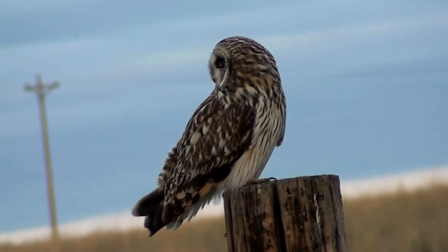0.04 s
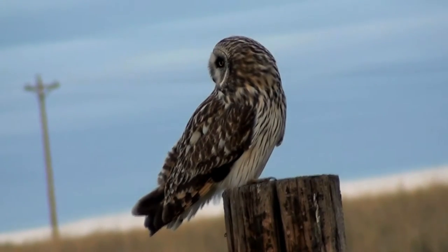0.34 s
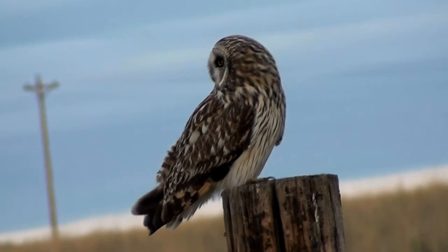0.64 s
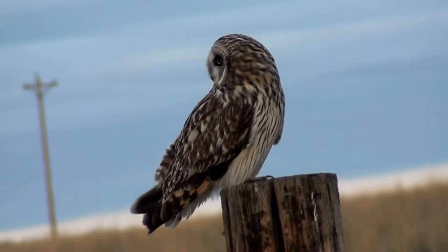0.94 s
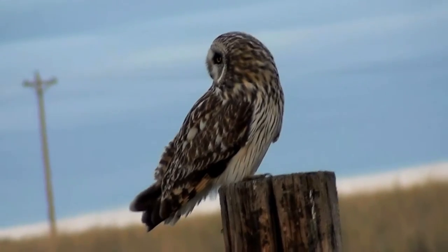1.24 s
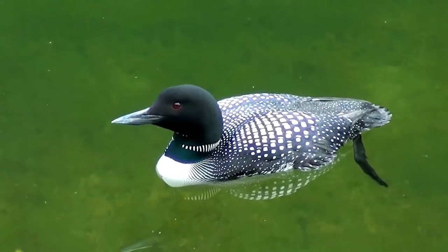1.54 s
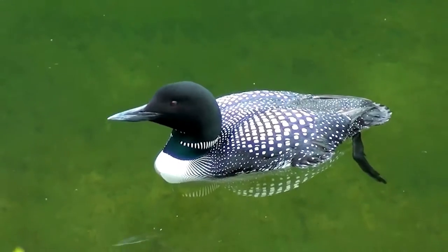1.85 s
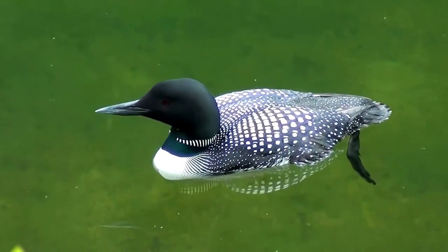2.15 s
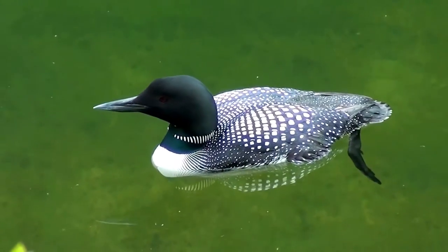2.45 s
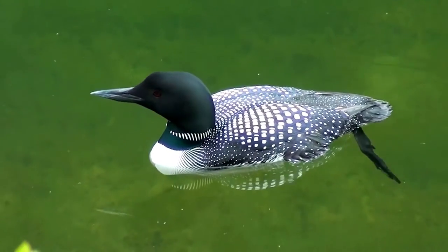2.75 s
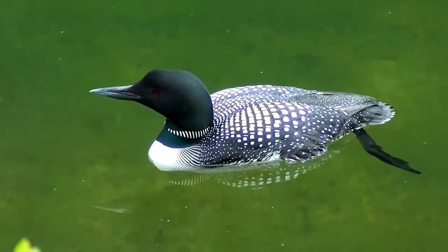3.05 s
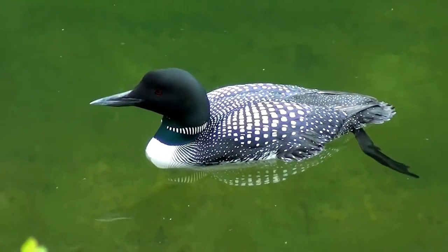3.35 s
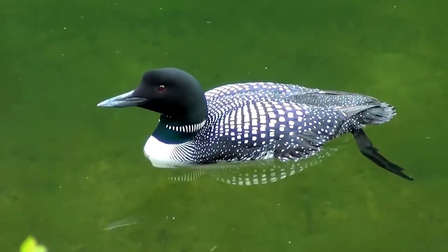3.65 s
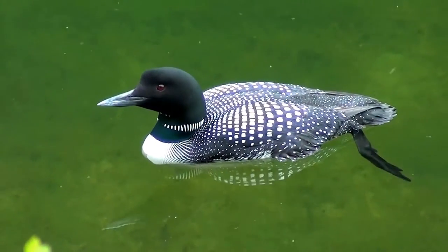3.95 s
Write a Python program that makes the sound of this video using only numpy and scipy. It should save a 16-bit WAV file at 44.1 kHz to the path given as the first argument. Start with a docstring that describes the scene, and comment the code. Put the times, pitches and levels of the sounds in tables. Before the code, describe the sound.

A small bird trills rapidly at a lakeside, after a songbird whistles a short, soft phrase in a quiet field. The high trill echoes slightly over a distant rush, and a dry tick comes near the end.

```python
"""A small bird trills at a lakeside, 16 syllables a second, each a burst of quick gliding tones.
Before it, in a quiet field, a songbird whistles a phrase, at times with both sides of its syrinx;
the field fades out and the lake fades in. The trill echoes off water and shore over a distant rush,
a low hum and hiss; one louder chirp and three dry ticks cut in.
A faint electrical whine lies under both scenes."""
import sys
import numpy as np
from scipy import signal
from scipy.fft import rfft, irfft, next_fast_len
from scipy.io import wavfile
from scipy.ndimage import map_coordinates

SR = 44100
rng = np.random.default_rng(int(sys.argv[2]) if len(sys.argv) > 2 else 0)


def int16_out(signal):
    """Quantize to a 16-bit WAV file."""
    q = np.round(np.clip(np.atleast_2d(signal).T, -1, 1) * 32767)
    wavfile.write(sys.argv[1], SR, q.astype(np.int16))


N = 176400
T = np.arange(N) / SR


def amp(db):
    """Decibels to gain."""
    return 10 ** (np.asarray(db) / 20)


def curve(points, hz):
    """Gain of an EQ curve drawn through (f/Hz, level/dB) points on a log frequency axis."""
    f, db = np.transpose(points)
    return amp(np.interp(np.log(hz + 1), np.log(f + 1), db))


def ramp(u):
    """A smooth step from 0 to 1."""
    return np.sin(np.pi / 2 * np.clip(u, 0, 1)) ** 2


def wobble(rate):
    """A smooth random curve, rate knots a second."""
    return map_coordinates(rng.standard_normal(int(N * rate / SR) + 4), [T * rate])


def filtered(x, response):
    """Filter x with a gain given as a function of frequency."""
    size = next_fast_len(N + SR // 2)
    return irfft(rfft(x, size) * response(np.fft.rfftfreq(size, 1 / SR)), size)[..., :N]


def noise(response, width):
    """Coloured stereo noise with a mid of rms 1; the width curve sets side over mid."""
    mid, side = filtered(rng.standard_normal((2, N)),
                         lambda hz: response(hz) * np.array([np.ones_like(hz), curve(width, hz)]))
    return np.array([mid + side, mid - side]) / mid.std()


def add(track, onset, sound):
    """Mix a sound into a track at an onset in seconds."""
    i = round(onset * SR)
    sound, i = sound[max(-i, 0):], max(i, 0)
    track[i:i + len(sound)] += sound[:max(N - i, 0)]


def syrinx(notes):
    """A bird's voice: pure tones, each gliding on an arc through three pitches."""
    track = np.zeros(N)
    for onset, length, start, middle, end, db, tilt_db, attack, release in notes:
        t = np.arange(int(length * SR)) / SR
        progress = t / length
        hz = np.polyval(np.polyfit([0, .5, 1], [start, middle, end], 2), progress)
        envelope = amp(db + tilt_db * progress) * ramp(t / attack) * ramp((length - t) / release)
        add(track, onset, envelope * np.sin(2 * np.pi * (np.cumsum(hz) / SR + rng.random())))
    return track


def songbird():
    """A whistled phrase; where both sides of the syrinx sound at once, the notes beat."""
    # notes: t/s, length/s, start f/Hz, middle f/Hz, end f/Hz, level/dB, tilt/dB, attack/s, release/s
    whistles = [(-.02, 0.1, 2735, 2735, 2725, -49.5, -1.5, .01, .02),
                (.317, 0.086, 3085, 3042, 3060, -48.5, -12, 0.015, .015),
                (.338, 0.056, 2975, 2972, 2920, -51, -4, 0.0082, .015),
                (.421, .046, 3150, 3330, 3970, -52.5, -1, 0.015, 0.011),
                (.427, .042, 3560, 3606, 3920, -52.5, 1, .015, .012),
                (.464, 0.047, 3940, 4400, 4450, -51, -10, 0.004, .008),
                (.514, 0.014, 4450, 4150, 3950, -51.5, -2, 0.0065, .006),
                (.536, 0.063, 3716, 3694, 3692, -49, -1, 0.012, .014),
                (.646, .011, 4150, 4100, 4000, -60, 0, .004, .004),
                (.665, .035, 3780, 2980, 2400, -48.5, -8, .003, .004),
                (.666, 0.034, 3470, 2770, 2340, -52, -3.5, .003, 0.0037),
                (.758, 0.018, 3550, 3550, 3430, -48.5, 0, 0.013, .006),
                (.780, 0.11, 3470, 3343, 3480, -45.5, -3.5, 0.0022, 0.026),
                (.974, .13, 2030, 1950, 1940, -56, -10, 0.0073, .04),
                (1.171, 0.037, 3274, 2790, 2360, -47, -7, 0.01, .007),
                (1.176, 0.034, 3050, 2610, 2260, -54.5, 3, 0.0044, 0.0063),
                (1.210, 0.039, 2940, 2740, 2660, -43.5, -12.5, .007, .003)]
    return syrinx(whistles)


def field_air():
    """The quiet field: a steady, broad bed of noise, widest in the midrange."""
    colour = [(25, -10), (62, -3), (90, -2.5), (130, 1.5), (185, -1), (250, 3), (295, 3.5), (390, -1),
              (800, -2.5), (1300, -4), (3000, -6), (6000, -7.5), (15500, -9)]  # spectrum: f/Hz, relative level/dB
    width = [(60, -12), (110, -12), (200, -6.5), (380, -2.5), (700, 2.5), (1290, 0.5), (2380, -1.5),
             (4400, -6), (8120, -11), (15000, -44)]  # stereo width: f/Hz, side over mid/dB
    return amp(-59.5) * noise(lambda hz: curve(colour, hz), width)


def electrical_whine():
    """Two faint, steady high tones."""
    tones = [(2524, -71), (8393, -78.5)]  # sines: f/Hz, rms level/dB
    return sum(amp(db) * np.sqrt(2) * np.sin(2 * np.pi * hz * T) for hz, db in tones)


def lake_air(swell_db=0.37, flutter_db=0.24):
    """A distant, gently wavering rush with narrow drones in it, leaning left, over steady hiss."""
    rush_colour = [(25, -23), (48, -16), (68, -12), (90, -7), (160, -1.5), (260, -4), (340, -3.5),
                   (435, -1.5), (570, -3), (800, 1), (1120, -4), (1550, -2.5), (1850, -6.5), (2400, -11.5),
                   (2800, -18.5), (3300, -35), (4500, -31), (8000, -48)]  # rush spectrum: f/Hz, relative level/dB
    drones = [(84.8, 23, -68.5), (126.4, 17, -68), (221.5, 16, -69), (443, 25, -72), (840, 76, -61.5),
              (1590, 200, -68)]  # noise bands: f/Hz, bandwidth/Hz, level before panning/dB
    hiss_colour = [(100, -6), (3000, 2), (8000, 1), (11000, -1), (15500, -1.5)]  # hiss spectrum: f/Hz, relative level/dB
    width = [(60, -31), (100, -28), (210, -16.5), (380, -12), (750, -12), (1300, -11), (2700, -7),
             (4400, -4.5), (8000, -11.5), (11000, -32.5), (15000, -50)]  # stereo width: f/Hz, side over mid/dB
    balance = [(60, 0.0), (110, 0.0), (200, 1.5), (380, 1), (700, 2.5), (1290, 2.5), (2380, 3), (4400, 7),
               (8120, 2), (15000, 2)]  # pan of the rush: f/Hz, left over right/dB
    rush = amp(-49.5) * noise(lambda hz: curve(rush_colour, hz), width)
    for centre, bandwidth, db in drones:
        rush += amp(db) * noise(lambda hz: 1 / (1 + (2 * (hz - centre) / bandwidth) ** 2), width)
    rush = filtered(rush, lambda hz: curve(balance, hz) ** np.array([[.5], [-.5]]))
    rush *= amp(swell_db * wobble(2.64) + flutter_db * wobble(17))
    hiss = amp(-58) * noise(lambda hz: curve(hiss_colour, hz), width)
    return rush + hiss


def hum(pitch_hz=83.4, wander_hz=2.98, level_db=-67, waver_db=3.5):
    """A low, distant tone that wavers in pitch and level."""
    hz = pitch_hz + wander_hz * wobble(9)
    rms = amp(level_db + waver_db * wobble(7.9))
    return rms * np.sqrt(2) * np.sin(2 * np.pi * np.cumsum(hz) / SR)


def trill(trim_db=-1, leaf_delay_s=.0025, leaf_db=-8.5):
    """One syllable over and over, its strokes never quite alike, each scattering off nearby leaves."""
    # strokes of one syllable: t/s from its start, length/s, start f/Hz, middle f/Hz, end f/Hz,
    # relative level/dB, tilt/dB, attack/s, release/s
    strokes = [(-.0015, .0055, 3690, 4750, 4800, -51.5, 2.5, .002, 0.0023),
               (.0025, .0055, 3710, 4877, 5600, -45, -3.5, 0.0022, 0.0018),
               (.0068, 0.00558, 3890, 5270, 6000, -45, -5, 0.0015, 0.0014),
               (0.0104, 0.0057, 5570, 6290, 7500, -53, -5, .002, 0.0023),
               (0.0142, .009, 5140, 6360, 7900, -51.5, -7.5, 0.0015, .004),
               (0.0238, 0.0109, 7300, 6090, 6090, -54.5, 8.5, .004, .003),
               (.0288, 0.00797, 7506, 6270, 6030, -57, 11.5, .002, .002),
               (0.034, .008, 5950, 5960, 5730, -60, -7.5, 0.0025, 0.0027)]
    syllables = [(1.441, -0.5), (1.501, -0.5), (1.566, -0.5), (1.628, -0.5), (1.69, 0), (1.754, -0.5),
                 (1.815, 0), (1.878, -0.5), (1.94, 0.5), (2.001, -0.5), (2.065, 0), (2.129, 0), (2.192, 0),
                 (2.256, 0.5), (2.319, 1.5), (2.383, 1), (2.445, 1), (2.51, 1), (2.571, 0.5), (2.638, 0),
                 (2.701, 2), (2.766, 1.5), (2.831, 1), (2.896, 1.5), (2.964, -0.5), (3.028, 0.5),
                 (3.094, 0), (3.153, 0.5), (3.221, 0), (3.287, -1), (3.355, 0), (3.419, 0), (3.485, 0),
                 (3.549, 1.5), (3.615, 1), (3.678, 0.5), (3.743, 0.5), (3.812, 0), (3.876, -0.5)]  # rhythm and accents: t/s, relative level/dB
    pitch_scatter, time_scatter_s, level_scatter_db = .005, .0003, 1.25
    notes = []
    for onset, accent_db in syllables:
        for offset, length, start, middle, end, db, *shape in strokes:
            late, sharp, loud = rng.standard_normal(3)
            pitches = np.array([start, middle, end]) * (1 + pitch_scatter * sharp)
            time = onset + offset + time_scatter_s * late
            level = trim_db + accent_db + db + level_scatter_db * loud
            notes.append((time, length, *pitches, level, *shape))
            notes.append((time + rng.exponential(leaf_delay_s), length, *pitches, level + leaf_db, *shape))
    return syrinx(notes)


def shore(call, wet_db, t60_s=0.27, width=0.22):
    """The direct call, two early echoes off water and shore, and a diffuse tail from the trees."""
    echoes = [(.0048, -10), (0.0193, -19.5)]  # early reflections: delay t/s, relative level/dB
    tail_colour = [(3500, 2), (5400, -2), (6000, 2.5), (6700, 0), (9000, -6)]  # reverb EQ: f/Hz, relative level/dB
    t = np.arange(SR // 2) / SR
    mid, side = rng.standard_normal((2, len(t))) * amp(-60 * t / t60_s)
    tails = (mid + width * np.array([side, -side])) / np.linalg.norm(mid)
    early = filtered(call, lambda hz: 1 + sum(amp(db) * np.exp(-2j * np.pi * hz * delay)
                                              for delay, db in echoes))
    late = signal.fftconvolve(call[None], tails, axes=1)[:, :N]
    return early + amp(wet_db) * filtered(late, lambda hz: curve(tail_colour, hz))


def ticks(crack_db=-12, crack_t60_s=0.012, cutoff_hz=11000):
    """Tiny dry snaps: a crack of noise and a very short ring."""
    snaps = [(1.7312, -44), (3.2825, -45), (3.7503, -23)]  # hits: t/s, gain/dB
    ring_modes = [(1530, -10.5, 0.011), (4000, -18, 0.0099), (6100, -18, 0.018), (6650, -5.5, 0.0081),
                  (8050, -6.5, 0.0057), (9200, -11, 0.0079)]  # resonances: f/Hz, relative level/dB, t60/s
    track, t = np.zeros(N), np.arange(SR // 20) / SR
    lowpass = signal.butter(8, cutoff_hz, fs=SR, output="sos")
    for onset, gain_db in snaps:
        ring = sum(amp(db - 60 * t / t60) * np.sin(2 * np.pi * hz * t) for hz, db, t60 in ring_modes)
        crack = rng.standard_normal(len(t)) * amp(crack_db - 60 * t / crack_t60_s)
        add(track, onset, amp(gain_db) * signal.sosfilt(lowpass, ring + crack))
    return track


def chirp():
    """One sharp call: overlapping strokes flick up and sweep down."""
    # strokes: t/s, length/s, start f/Hz, middle f/Hz, end f/Hz, level/dB, tilt/dB, attack/s, release/s
    strokes = [(2.897, .005, 5600, 7100, 8100, -47, -2, .002, .002),
               (2.902, 0.018, 8240, 6080, 4640, -44, -5, .003, .005),
               (2.903, 0.0069, 4680, 6280, 8300, -52, -1, .002, .002),
               (2.908, 0.018, 8530, 6600, 5160, -49, -11, 0.0018, .004)]
    return syrinx(strokes)


def scene():
    """The field fades out; after a breath of silence the lake fades in."""
    fade_out_s, fade_in_s = (1.319, 1.366), (1.3965, 1.4395)
    whine = electrical_whine()
    field = songbird() + field_air() + whine
    birds = shore(trill(), wet_db=-11.5) + shore(chirp(), wet_db=-5)
    birds *= amp([[-.6], [.6]])  # just right of centre
    lake = birds + ticks() + hum() + lake_air() + whine
    return field * ramp(np.interp(T, fade_out_s, (1, 0))) + lake * ramp(np.interp(T, fade_in_s, (0, 1)))


def record(dry, top_hz=15800):
    """A brick-wall low-pass over the whole mix."""
    return filtered(dry, lambda hz: hz < top_hz)


dry = scene()
out = record(dry)
int16_out(out)
```